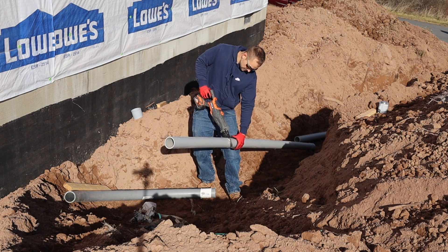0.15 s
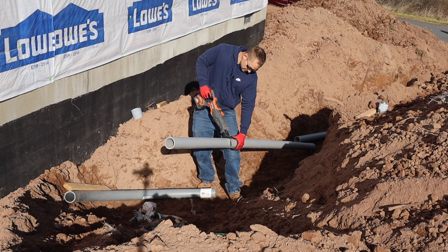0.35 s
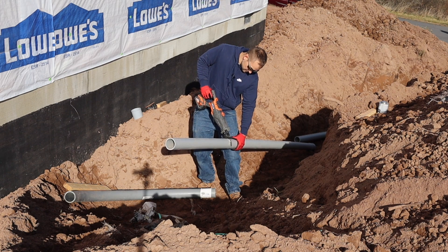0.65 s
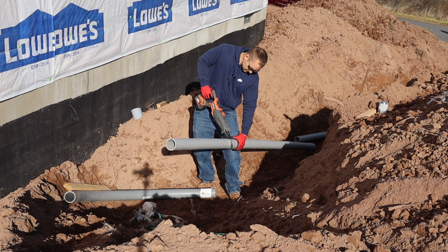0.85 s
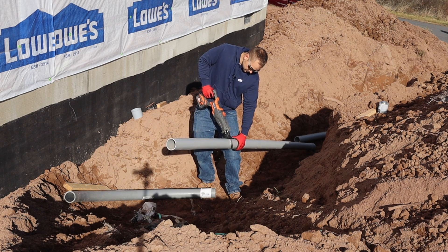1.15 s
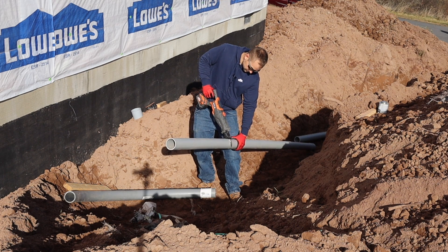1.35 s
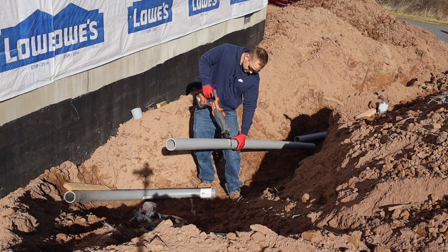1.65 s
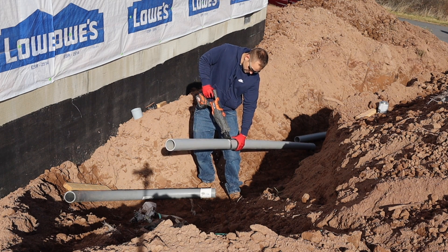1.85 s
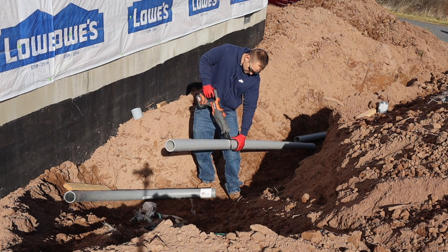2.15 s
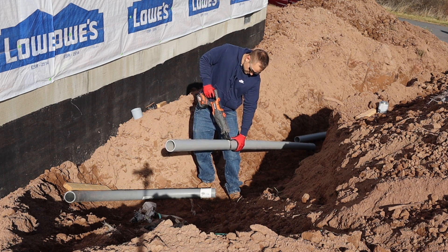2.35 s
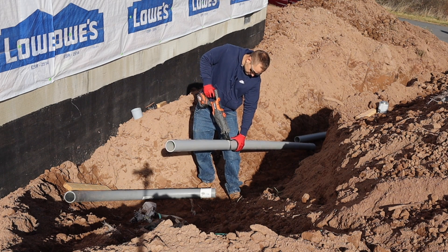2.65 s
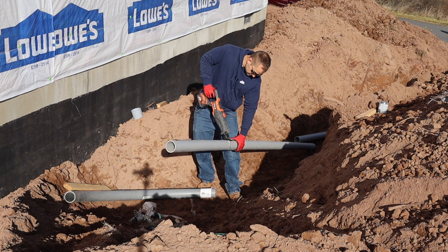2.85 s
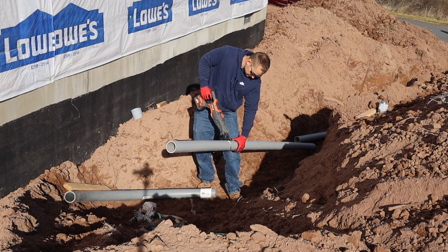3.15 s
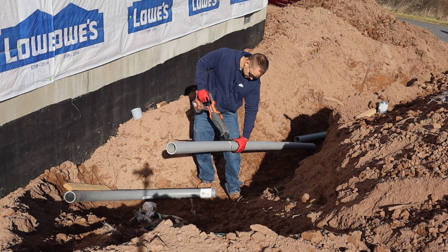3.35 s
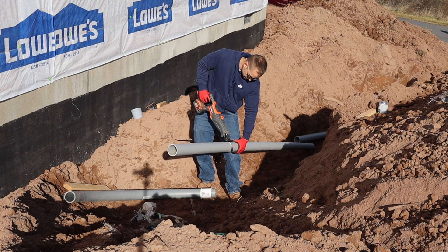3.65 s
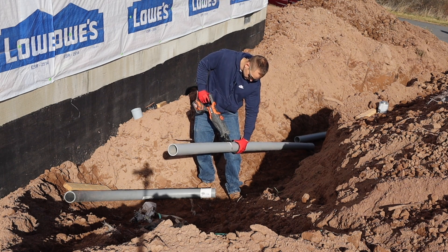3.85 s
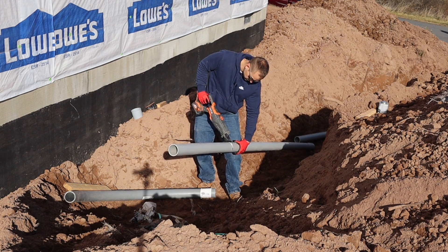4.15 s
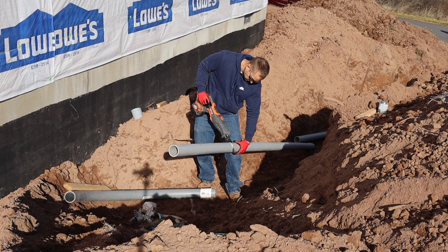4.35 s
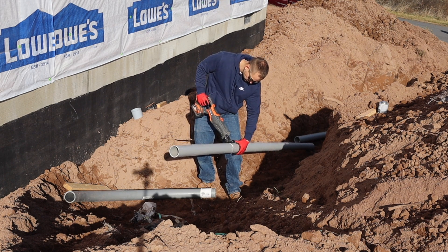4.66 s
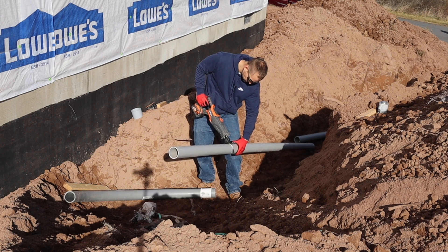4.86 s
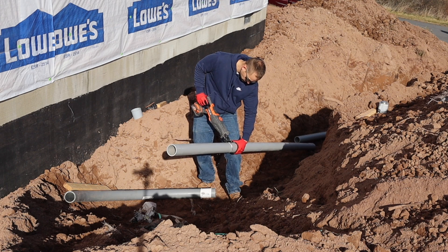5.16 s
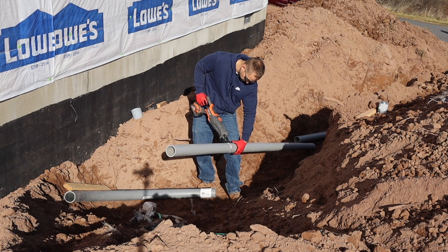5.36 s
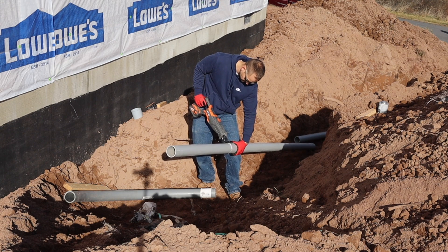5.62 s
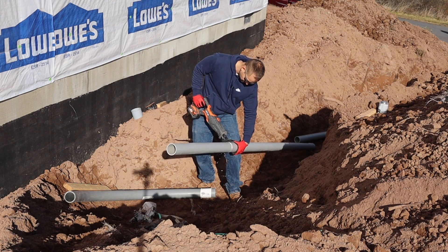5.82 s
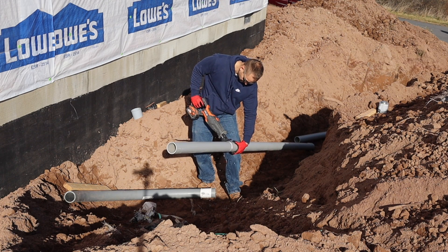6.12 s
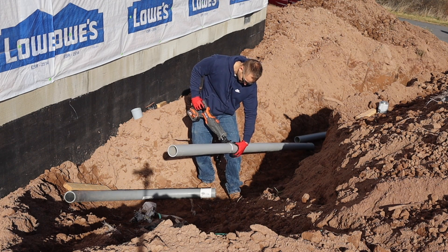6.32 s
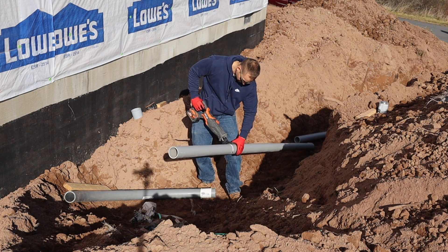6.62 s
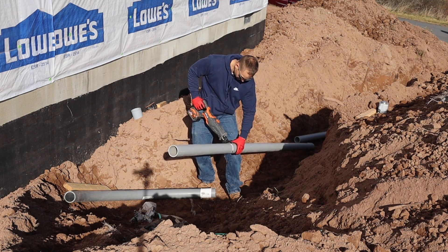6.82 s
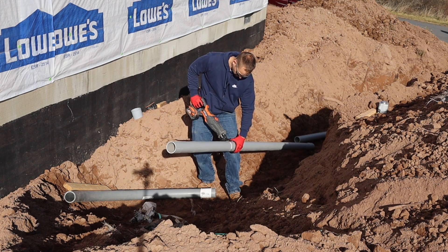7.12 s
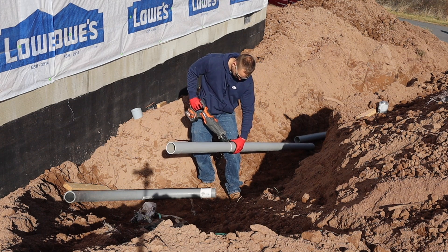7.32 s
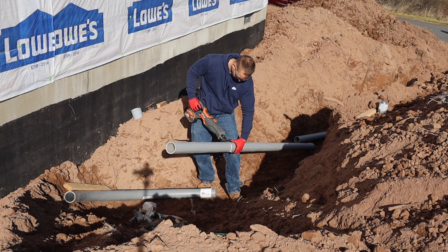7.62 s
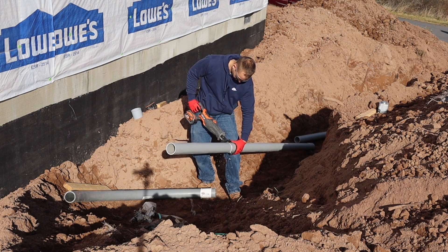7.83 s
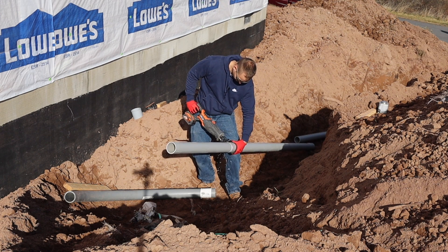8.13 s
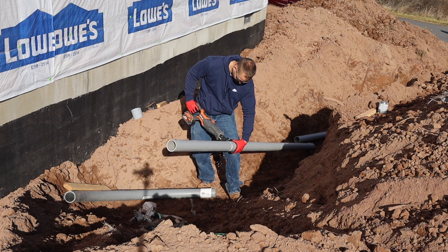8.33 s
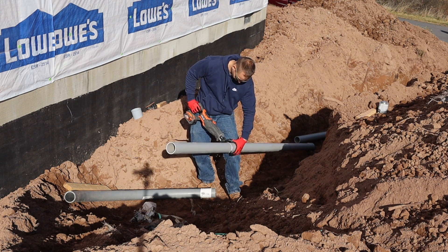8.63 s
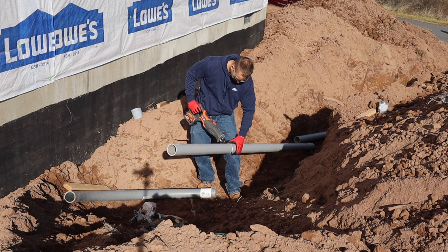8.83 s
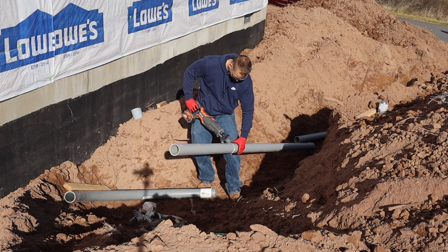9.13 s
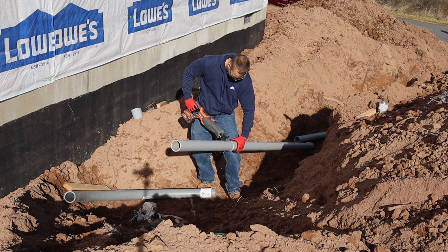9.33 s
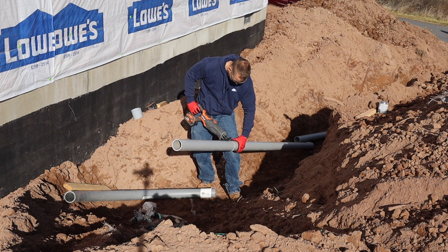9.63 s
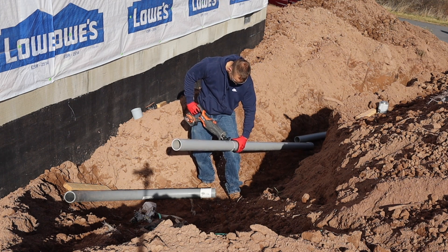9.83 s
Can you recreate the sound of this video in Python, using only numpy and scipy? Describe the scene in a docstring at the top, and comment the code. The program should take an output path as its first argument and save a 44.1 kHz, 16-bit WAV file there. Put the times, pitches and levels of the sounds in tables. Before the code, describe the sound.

Dense machine-gun-like strokes of a power saw drone steadily through plastic pipe, with dull thumps of the shoe and bright tearing of teeth. The pipe rattles more as it loosens. After one long run come a brief quiet gap, a shorter run, another gap, a violent jammed stutter, then a small whine and a renewed spin-up. Clear outdoor pickup a few steps away, short earthy echo, very light low wind.

```python
"""A reciprocating saw is already cutting a hand-held plastic pipe in an earth trench: one long run,
then a second run, a jammed burst and a restart. Each stroke fires one pattern of knocks through saw and pipe;
the shoe thumps on the pipe and shaped noise makes the teeth rasp through the cut. Single blows ring the pipe.
Sines shake with the stroke and whine at the restart, filtered noise hisses as the motor coasts and booms in the jam.
The banks return a short, dull tail to the cut, and a light wind rumbles underneath."""
import sys
import numpy as np
from scipy import signal
from scipy.fft import rfft, irfft
from scipy.io import wavfile
from scipy.ndimage import uniform_filter1d

SR = 44100
rng = np.random.default_rng(int(sys.argv[2]) if len(sys.argv) > 2 else 0)


def master(y):
    """Save y as 16-bit WAV."""
    cut = np.clip(np.atleast_2d(y).T, -1, 1)
    pcm = np.round(cut * 32767)  # scale
    wavfile.write(sys.argv[1], SR, pcm.astype(np.int16))


N = 440118
TIME = np.arange(N) / SR   # seconds

# The trigger is held four times: the long cut, the second cut, the jam and the restart.
# Each row: pulled in seconds, released in seconds, spin-up in seconds, then base levels of
# saw clatter in dB, pipe rattle in dB and teeth in dB, before the state of the cut shifts them.
RUNS = [(-0.1, 6.252, .05, -18.5, -27, -31), (6.994, 8.512, 0.096, -18, -26.5, -31),
        (9.179, 9.45, 0.075, -22.5, -27.5, -29.5), (9.642, 10.1, 0.13, -20, -26, -25)]
# How far the kerf has opened the pipe. Each row: time in seconds, share 0-1.
KERF = [(3, .05), (4, 1), (8, 1)]
# How loosely the half-cut pipe hangs. Each row: time in seconds, share 0-1.
SLACK = [(0, 0.11), (4.5, 0.05), (5.3, 0.17), (5.9, 0.71), (7.3, .75), (7.6, 0.47), (8.3, 0.77),
         (9.98, 0.9)]
# Resonances of the pipe once the kerf is deep. Each row: centre in Hz, width in Hz, boost in dB.
SLIT_MODES = [(271, 27, 6.5), (433, 140, 1), (950, 55, 3.5), (1232, 420, 8.5), (2080, 220, 5),
              (2480, 180, 4.5), (3900, 200, 3)]


def from_db(db):
    """Decibels to gain."""
    return 10 ** (np.asarray(db) / 20)


def noise():
    """White noise of rms 1."""
    return rng.standard_normal(N)


def unit(x):
    """Scale to a standard deviation of 1."""
    return x / np.std(x)


def body(x, colour, modes=(), size=8192):
    """Ring x through a causal (minimum-phase) body made of a broad colour and resonances."""
    hz = np.maximum(np.fft.rfftfreq(size, 1 / SR), 1)
    points, level = np.transpose(colour)
    db = np.interp(np.log(hz), np.log(points), level)
    for centre, width, boost in modes:
        db = db + boost / (1 + (2 * (hz - centre) / width) ** 2)
    # folding the cepstrum onto positive time puts the energy as early as possible
    cepstrum = irfft(np.log(from_db(db)))
    cepstrum[1:size // 2] *= 2
    cepstrum[size // 2 + 1:] = 0
    ring = irfft(np.exp(rfft(cepstrum)))
    return signal.fftconvolve(x, ring)[:N]


def evened(x, band):
    """Hold the rms within a band (Hz) close to 1 over a few strokes."""
    bandpass = signal.butter(4, band, "band", fs=SR, output="sos")
    inside = signal.sosfilt(bandpass, x) ** 2
    power = uniform_filter1d(uniform_filter1d(inside, size=1900), size=1900)
    return x / np.sqrt(np.abs(power) + inside.mean() / 20)   # the floor keeps pauses quiet


def clicks(times, gains):
    """One impulse at each time."""
    inside = (times >= 0) & (times < TIME[-1])
    return np.bincount((times[inside] * SR).astype(int), gains[inside], N)


def share(rows):
    """Rows of seconds and share 0-1 joined by straight lines."""
    return np.clip(np.interp(TIME, *np.transpose(rows)), 0, 1)


def spells(rows, edge_s):
    """Gain that fades in, holds and fades out for each row: from seconds, to seconds, dB."""
    gain = 0
    for start, end, db in rows:
        inward = np.minimum(TIME - start, end - TIME)
        gain = gain + from_db(db) * np.clip(inward / edge_s + .5, 0, 1)
    return gain


def wander(count):
    """Slow chance: count random values spread over the scene and joined by straight lines."""
    return np.interp(TIME, np.linspace(0, TIME[-1], count), rng.standard_normal(count))


def running(levels_db, swell, linger_s):
    """Gain of one part: it swells as the motor spins up, holds, lingers after the release and dies."""
    dies_db_per_s = 399
    gain = 0
    for (pulled, released, spin_up, *_), db in zip(RUNS, levels_db):
        rise = np.clip((TIME - pulled) / spin_up, 0, 1) ** swell
        dying_s = np.clip(TIME - released - linger_s, 0, 1)
        gain = gain + rise * from_db(db - dies_db_per_s * dying_s)
    return gain


def stroke_times():
    """A stroke falls wherever the summed motor speed passes a whole number."""
    # Motor speed, sagging under load: one list for each run.
    # Each row: time in seconds, speed in strokes per second.
    speed = [
        [(0, 46.99), (1.35, 46.98), (2.59, 46.7), (3.32, 45.66), (3.6, 48.26), (4.1, 46.43), (4.63, 48.51),
         (5.16, 47.72), (5.7, 44.18), (6.02, 45.93), (6.4, 45.83)],
        [(7, 42.76), (7.06, 44.86), (7.59, 46.93), (8.25, 45.03), (8.65, 47.74)],
        [(9.18, 33), (9.338, 51.5), (9.372, 30), (9.43, 39), (9.57, 40)],
        [(9.65, 25.9), (9.8, 43.87), (9.98, 44.76)],
    ]
    times = []
    for run in speed:
        t = TIME[(TIME >= run[0][0]) & (TIME <= run[-1][0])]
        turns = np.cumsum(np.interp(t, *np.transpose(run))) / SR
        times += list(np.interp(np.arange(turns[-1]), turns, t))
    after_last = 2 * times[-1] - times[-2]
    return np.array(times + [after_last])


def stroke_pressure(turns):
    """The push of the teeth repeats with every stroke."""
    # Tooth pressure before each sound bends it. Each row: place in the stroke 0-1, level in dB.
    bite_rows = [(0, -5), (.1, -1), (.22, -8), (.31, -10.5), (.4, -13.5), (.6, -15.5), (.8, -12),
                 (.88, -16), (.94, -1.5)]
    return from_db(np.interp(turns, *np.transpose(bite_rows), period=1))


def efforts(unsteady_db=0.84):
    """Gains of clatter, rattle, thump and teeth from the trigger, the pipe's state and the pressure on the saw."""
    # The blade digs in for a moment. Each row: centre in seconds, length in seconds,
    # extra teeth in dB, extra clatter in dB.
    digs = [(1.62, .12, 2, 0), (3.57, 0.38, 5, 0.5), (4.82, 0.22, 4.5, 0.3), (5.62, 0.22, 2.5, -0.45),
            (6.2, .16, 2, .5), (7.15, 0.27, 4, 4.5), (8.212, 0.48, 6, -1.7)]
    # The shoe is pressed against the pipe. Each row: from seconds, to seconds, thump in dB.
    presses = [(-0.1, 1.1, -34), (1.1, 3.2, -31.5), (3.2, 3.33, -26.5), (3.95, 4.15, -28.5),
               (4.15, 5.45, -36), (5.45, 6.3, -29), (7.1, 7.5, -28), (7.5, 7.68, -33), (7.68, 8.36, -27.5),
               (9.215, 9.4, -25), (9.735, 9.78, -19)]
    resting_shoe_db = -43.5   # a floor under the presses
    slack_clatter_db, slack_rattle_db = -3.5, 6.5   # a slack pipe rattles more and resists the saw less
    kerf_teeth_db, kerf_clatter_db = 3, -1.44   # an open kerf sets more teeth to work; the saw clatters less

    clatter_db, rattle_db, teeth_db = np.transpose(RUNS)[3:]
    slack, kerf = share(SLACK), share(KERF)
    dig_teeth_db, dig_clatter_db = 0, 0
    for s, length, extra_teeth_db, extra_clatter_db in digs:
        dig = np.exp(-np.minimum((2 * (TIME - s) / length) ** 2, 20))
        dig_teeth_db = dig_teeth_db + extra_teeth_db * dig
        dig_clatter_db = dig_clatter_db + extra_clatter_db * dig

    clatter_shift_db = slack_clatter_db * slack + kerf_clatter_db * kerf + dig_clatter_db
    teeth_shift_db = kerf_teeth_db * kerf + dig_teeth_db + unsteady_db * wander(count=160)
    shoe_force = np.hypot(from_db(resting_shoe_db), spells(presses, edge_s=.065))
    clatter = running(clatter_db, swell=1.05, linger_s=.003) * from_db(clatter_shift_db)
    rattle = running(rattle_db, swell=0.72, linger_s=0.033) * from_db(slack_rattle_db * slack)
    thump = running(np.zeros(len(RUNS)), swell=0.73, linger_s=0.054) * shoe_force
    rasp = running(teeth_db, swell=1.02, linger_s=.028) * from_db(teeth_shift_db)
    return clatter, rattle, thump, rasp


def contacts(strokes, places, levels_db, jitter_s, creep_s, spread_db, limp_db):
    """Each stroke repeats the contacts; they creep as the grip shifts, and every second stroke is weaker."""
    number = np.arange(len(strokes))[:, None]
    late, force, grip = rng.standard_normal((3, len(strokes), len(places)))
    # the grip shifts slowly, over dozens of strokes
    creep = unit(uniform_filter1d(uniform_filter1d(grip, size=24, axis=0), size=24, axis=0))
    times = np.interp(number + places, number[:, 0], strokes, left=-1, right=-1)
    times = times + jitter_s * late + creep_s * creep
    return clicks(times, from_db(levels_db + spread_db * force + limp_db * (number % 2)))


def pipe(x, colour):
    """The pipe's ring shifts from whole to slit resonances as the kerf opens."""
    # Resonances of the barely cut pipe. Each row: centre in Hz, width in Hz, boost in dB.
    whole_modes = [(442, 53, 4.5), (1228, 170, 5.5), (2090, 200, 1), (2550, 180, 4), (2860, 130, -2.5),
                   (4070, 400, 2)]
    kerf = share(KERF)
    return (1 - kerf) * body(x, colour, whole_modes) + kerf * body(x, colour, SLIT_MODES)


def saw_and_pipe(strokes, pressure, clatter_gain, rattle_gain, thump_gain):
    """Hard knocks of the drive, looser rattling of the pipe, and the dull thump of the shoe."""
    # Contacts within one stroke. Each row: place in the stroke relative to its start (1 is a full stroke),
    # relative saw clatter in dB, relative pipe rattle in dB.
    contact_rows = [(-.215, -17.5, -6.5), (-.12, -5.5, -8), (-.02, -2.5, -1.5), (0.028, -6.5, -0.5),
                    (.09, -14, -2.5), (.15, -12, -4), (0.258, -9.5, -3), (.305, -7, -8), (.42, -8, -2.5),
                    (.5, -14, -7), (.6, -18, -5), (0.689, -17, -14)]
    # The shoe hits the pipe and rebounds. Each row: place in the stroke 0-1, relative level in dB.
    shoe_rows = [(0.042, -2), (0.319, -5)]
    # Broad colours of the three sounds. Each row: frequency in Hz, relative level in dB.
    clatter_colour = [(300, -43.5), (800, -18), (1150, -4.5), (1500, -6), (1900, 2), (2600, -1.5),
                      (3000, -6.5), (3400, -19.5), (4100, -11), (5000, -22.5), (9000, -33), (15000, -43.5)]
    rattle_colour = [(100, -12.5), (220, 2), (275, -7), (310, -3), (360, 0), (480, 1), (700, 2), (860, -2),
                     (1200, -3.5), (1550, -5.5), (3000, -12), (10000, -40)]
    thump_colour = [(40, -35.5), (70, -11.5), (95, 3.5), (140, -2), (190, 1), (240, -4), (310, -11),
                    (600, -13.5), (2000, -61)]

    places, clatter_db, rattle_db = np.transpose(contact_rows)
    hard = unit(contacts(strokes, places, clatter_db,
                         jitter_s=.00008, creep_s=.0002, spread_db=1.4, limp_db=-0.4))
    loose = unit(contacts(strokes, places, rattle_db,
                          jitter_s=.00024, creep_s=.0004, spread_db=2.6, limp_db=-1.0))
    shoe = contacts(strokes, *np.transpose(shoe_rows),
                    jitter_s=.00045, creep_s=.00025, spread_db=2.6, limp_db=-3.2)
    chips = unit(pressure * noise())   # torn plastic fills in between the knocks
    clatter = evened(pipe(hard + from_db(-13) * chips, clatter_colour), (1600, 3000))
    rattle = evened(pipe(loose + from_db(-10) * chips, rattle_colour), (350, 1100))
    thump = evened(pipe(shoe, thump_colour), (110, 260))
    return clatter_gain * clatter + rattle_gain * rattle + thump_gain * thump


def teeth(strokes, pressure, grain_db=3.5, uneven_db=3.0):
    """Teeth tear chips on the pull; where the cut pinches, the flank rubs both ways and the blade rings."""
    # Share of the rasp from the blade's flank in a pinched cut. Each row: time in seconds, share 0-1.
    pinch_rows = [(0, 0.86), (3.1, 0.5), (3.45, 1), (5.1, 0.95), (5.6, 0.3), (6.2, .9), (7.6, .85),
                  (8.1, 0.16), (9.98, 0.29)]
    # Broad colour of the rasp. Each row: frequency in Hz, relative level in dB.
    rasp_colour = [(800, -22), (2500, -6), (4000, -0.5), (5000, -6), (6000, -2.5), (7000, -2), (9000, -3),
                   (11500, -5), (13000, -9.5), (15500, -25)]
    # Resonances over that colour, for tearing teeth and for the rubbing flank.
    # Each row: centre in Hz, width in Hz, boost in dB.
    tooth_modes = [(4000, 250, 6), (6110, 320, 10.3), (8730, 1500, 4.9), (10300, 250, 4), (11500, 500, 4.8),
                   (12700, 440, 2.4)]
    flank_modes = [(5760, 450, 4), (8740, 950, 2.1), (11130, 450, 8.9), (12480, 270, 4)]

    lumps = unit(uniform_filter1d(noise(), size=30))
    grains = from_db(grain_db * np.clip(lumps, -2, 2))
    stroke_chance = rng.standard_normal(len(strokes))
    depth = from_db(uneven_db * np.interp(TIME, strokes, stroke_chance))
    # the bite follows the pressure steeply, the rub only faintly
    bite = unit(body(noise() * grains * pressure ** 1.5 * depth, rasp_colour, tooth_modes))
    rub = unit(body(noise() * grains * pressure ** 0.35, rasp_colour, flank_modes))
    pinch = share(pinch_rows)
    return evened(np.sqrt(1 - pinch) * bite + np.sqrt(pinch) * rub, (5500, 14000))


def knocks(crunch_s=0.0063, crunch_db=-15):
    """Single blows of the tool ring the pipe, each with a decaying crunch and crack of plastic."""
    # Each row: time in seconds, relative blow level in dB, relative crack level in dB.
    blow_rows = [(6.289, -9, -24), (6.756, -42, -55), (6.939, -35, -52), (6.974, -30.5, -46),
                 (6.998, 0.5, -21.5), (7.085, -1, -20), (7.109, 7, -18), (8.64, -17.5, -55),
                 (8.696, -27.5, -58), (9.11, -29, -57), (9.132, -32, -51), (9.168, -25, -39),
                 (9.274, 3.5, -24), (9.302, 2, -24), (9.321, 12.5, -7), (9.342, 4, -5), (9.37, -3, -16),
                 (9.427, -8, -5.5), (9.454, -14, -16), (9.528, -0.5, -26), (9.605, -23, -60),
                 (9.743, 2, -18), (9.793, -7, -14)]
    # Broad colours of the blow and of cracking plastic. Each row: frequency in Hz, relative level in dB.
    blow_colour = [(60, -22), (150, -5.5), (600, 8.5), (1100, 0), (1550, 5), (2200, -5), (3200, -3),
                   (4200, -11), (7000, -15), (15500, -37)]
    crack_colour = [(800, -17), (2500, -4), (4000, -0.5), (5500, -2.5), (9000, -1.5), (12500, -3.5),
                    (15500, -20)]

    times, blow_db, crack_db = np.transpose(blow_rows)
    dying = [1, -np.exp(-1 / (crunch_s * SR))]   # exponential decay
    blows = clicks(times, from_db(blow_db))
    crunch = signal.lfilter([1], dying, blows + 1e-18) * noise()
    crack = signal.lfilter([1], dying, clicks(times, from_db(crack_db)) + 1e-18) * noise()
    ringing = body(blows + from_db(crunch_db) * crunch, blow_colour, SLIT_MODES)
    return from_db(4.0) * ringing + from_db(1.0) * body(crack, crack_colour)


def tool_shake(turns):
    """The whole tool shakes at the stroke rate and its octave, the former less on a slack pipe."""
    shake_db, octave_db, waver_db, slack_shake_db = -41.5, -39.5, 0.5, -11
    swing = from_db(shake_db + slack_shake_db * share(SLACK) + waver_db * wander(count=20))
    shake = swing * np.sin(2 * np.pi * turns) + from_db(octave_db) * np.sin(4 * np.pi * turns)
    return shake * running(np.zeros(len(RUNS)), swell=0.97, linger_s=0)


def trigger_whine():
    """As the trigger is pulled again the motor's drive whines, swelling while its pitch falls."""
    from_s, to_s, level_db = 9.603, 9.662, -25
    start_hz, fall_hz_per_s = 1985, 1100
    since_start = np.clip(TIME - from_s, 0, None)
    angle = 2 * np.pi * np.cumsum(start_hz - fall_hz_per_s * since_start) / SR
    swell = since_start / (to_s - from_s) * spells([(from_s, to_s, level_db)], edge_s=.015)
    return (np.sin(angle) + from_db(-22) * np.sin(2 * angle)) * swell


def coasting():
    """The released motor spins down with an airy hiss of filtered noise."""
    # Each row: from seconds, to seconds, level in dB.
    coasts = [(6.3, 6.96, -55.5), (8.6, 8.96, -60)]
    # Colour of the hiss. Each row: frequency in Hz, relative level in dB.
    hiss_colour = [(1500, -8.5), (3600, -11.5), (4300, -1.5), (5000, -10), (6000, -1.5), (9000, 2),
                   (15500, -14)]
    return unit(body(noise(), hiss_colour)) * spells(coasts, edge_s=.04)


def heaving_pipe():
    """The jammed saw heaves the pipe with a low boom of filtered noise."""
    # Each row: from seconds, to seconds, level in dB.
    heaves = [(9.215, 9.45, -30)]
    # Colour of the boom. Each row: frequency in Hz, relative level in dB.
    boom_colour = [(20, -20), (40, -1), (100, -3), (170, -2), (500, -42)]
    return unit(body(noise(), boom_colour)) * spells(heaves, edge_s=.04)


def trench(x, wet_db=-13.5, t60=0.14, dull_hz=4500, delay_s=0.0027):
    """Earth banks and a foundation wall scatter back a short, dull tail."""
    tail = noise() * from_db(-60 * TIME / t60) * (TIME > delay_s)
    tail = tail / np.linalg.norm(tail)
    dull = signal.butter(1, [250, dull_hz], "band", fs=SR, output="sos")
    tail = signal.sosfilt(dull, tail)
    return x + from_db(wet_db) * signal.fftconvolve(x, tail)[:N]


def light_wind():
    """A light, steady wind: filtered noise, mostly low rumble."""
    # Colour of the wind. Each row: frequency in Hz, relative level in dB.
    wind_colour = [(20, -25), (40, -3), (60, -6), (140, -21), (200, -10.5), (260, -26.5), (400, -21.5),
                   (600, -33.5), (2500, -43.5), (14000, -50.5)]
    return unit(body(noise(), wind_colour)) * from_db(-50)


def scene():
    """The strokes drive the cut, which the trench reflects; boom, motor and wind are added directly."""
    strokes = stroke_times()
    turns = np.interp(TIME, strokes, np.arange(len(strokes)))
    pressure = stroke_pressure(turns)
    clatter, rattle, thump, rasp = efforts()
    cut = saw_and_pipe(strokes, pressure, clatter, rattle, thump)
    cut = cut + rasp * teeth(strokes, pressure) + knocks()
    motor = tool_shake(turns) + trigger_whine() + coasting()
    return (trench(cut) + heaving_pipe() + motor + light_wind())[None]


def record(dry, top=1.15):
    """At the microphone the deepest bass is lost, the loudest peaks are rounded and the top is cut."""
    cutoff_hz = 15750
    bass_cut = signal.butter(2, 22, "high", fs=SR, output="sos")
    rounded = top * np.tanh(signal.sosfilt(bass_cut, dry) / top)
    return signal.sosfilt(signal.ellip(10, .1, 80, cutoff_hz, fs=SR, output="sos"), rounded)


dry = scene()
out = record(dry)
master(out)
```